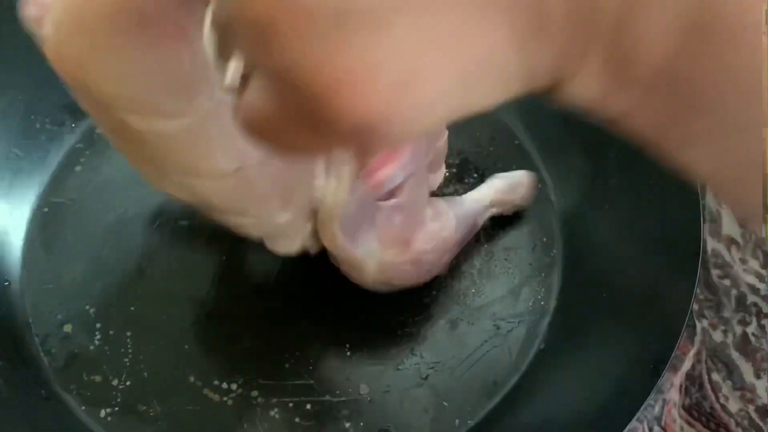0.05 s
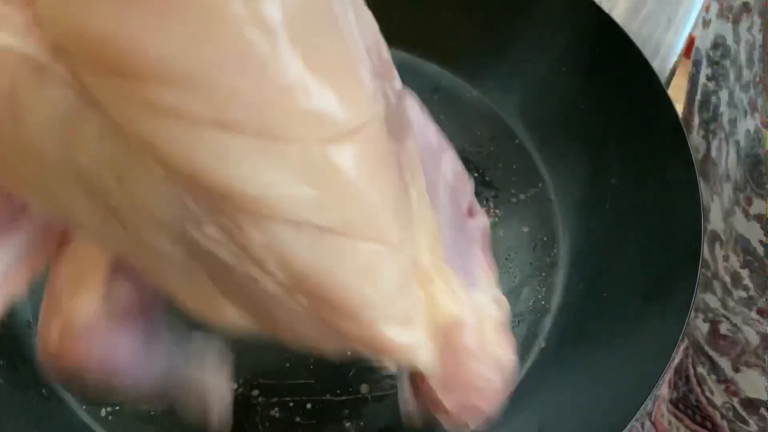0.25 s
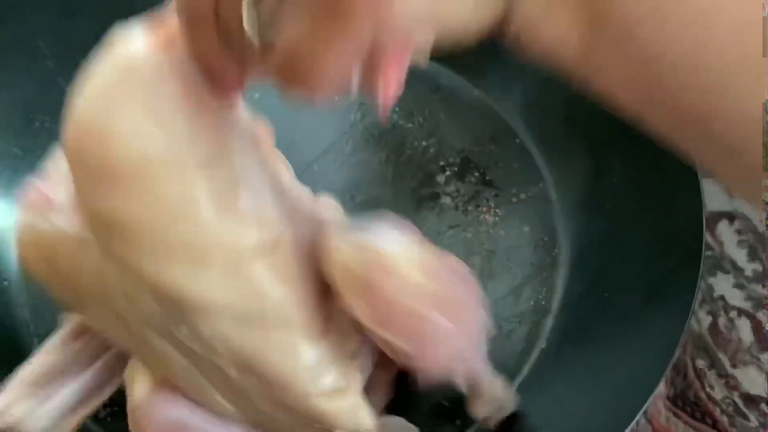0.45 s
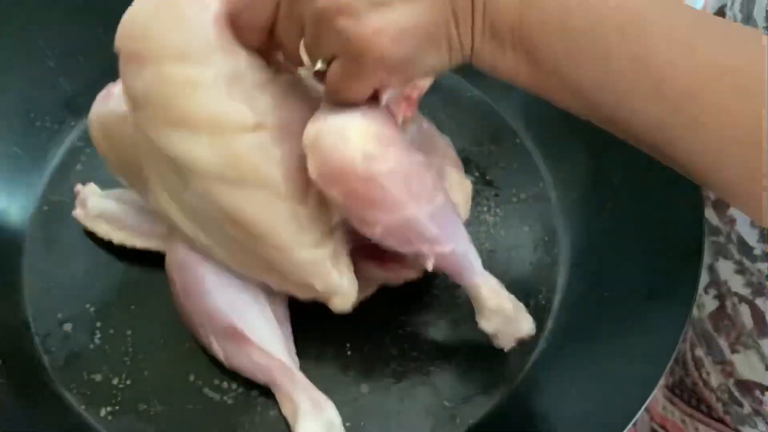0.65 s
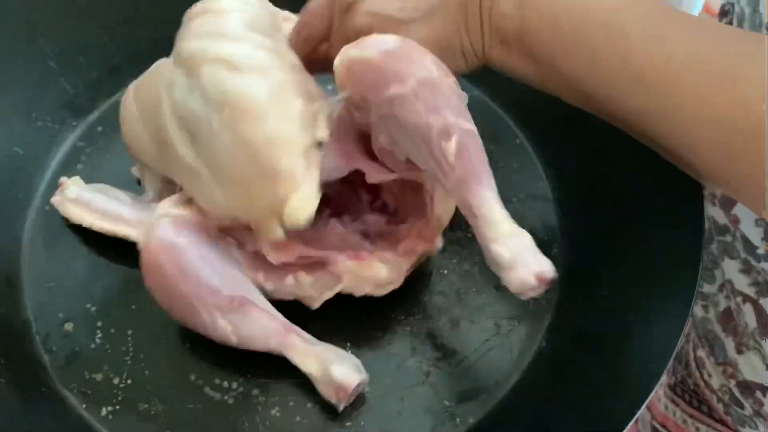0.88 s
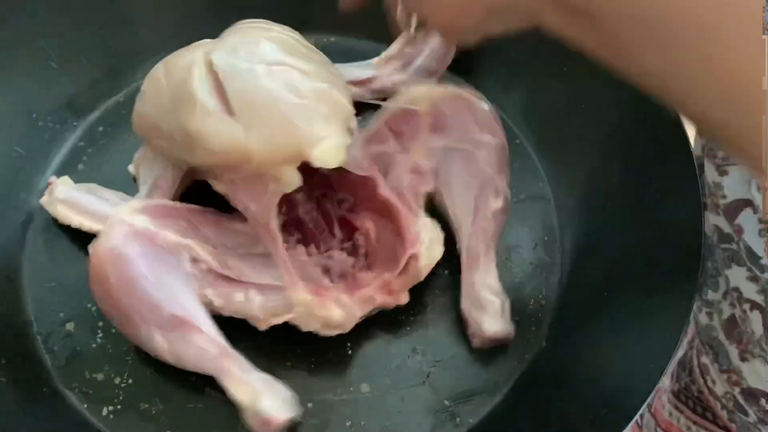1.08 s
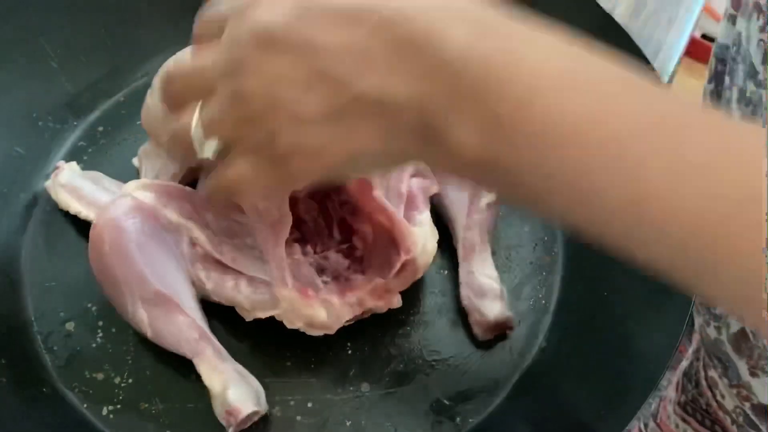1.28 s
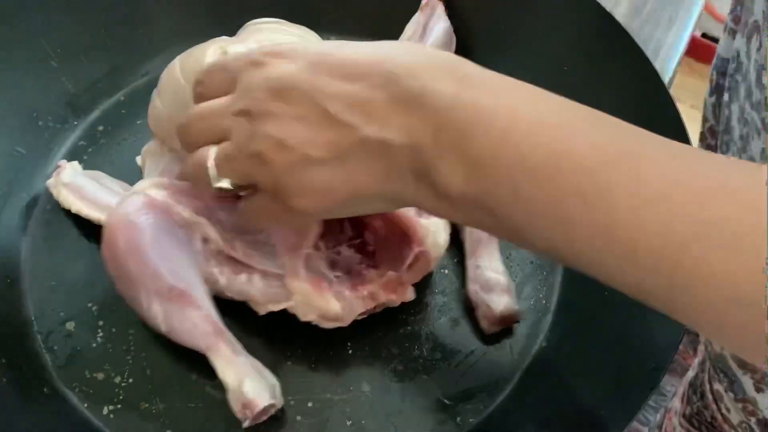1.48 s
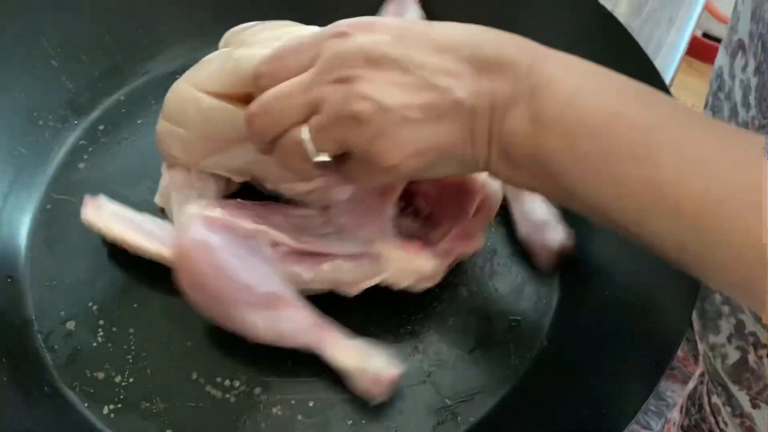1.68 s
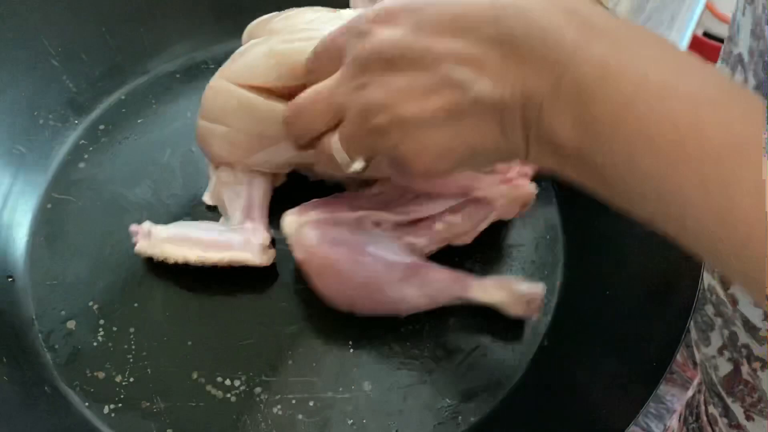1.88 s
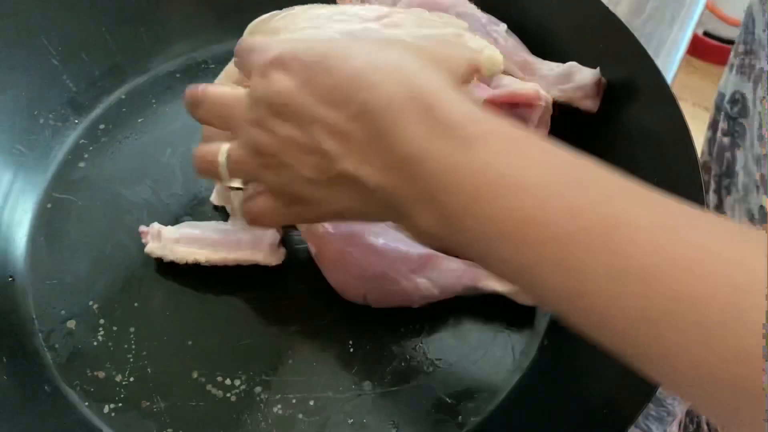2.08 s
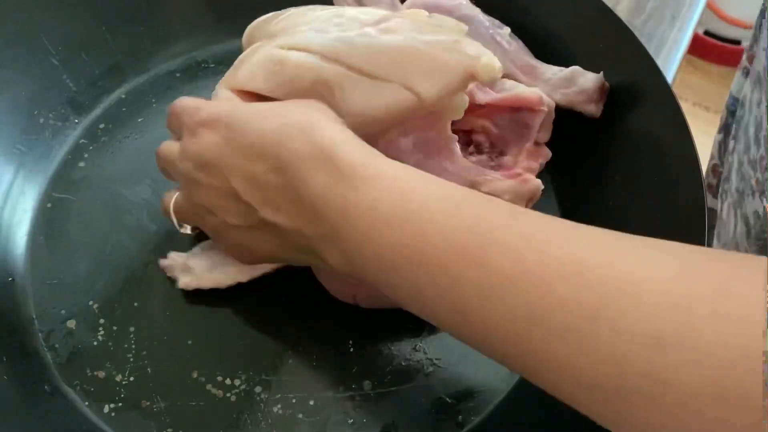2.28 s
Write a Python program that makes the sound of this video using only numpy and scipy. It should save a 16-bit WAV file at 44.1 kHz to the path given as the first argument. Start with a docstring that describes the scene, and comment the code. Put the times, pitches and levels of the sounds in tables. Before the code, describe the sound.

Wet slaps, soft thuds and sticky squishes of raw chicken being turned in a pan.

```python
"""In a quiet kitchen, close by, a raw chicken is turned over by hand in a wide metal pan.
At 0.2 s it slaps down and rolls; near 0.4 s it lands with a soft thud, each impact exciting the
pan's low modes into a boom. Then the fingers shift their grip: wet skin squishes, films of juice snap,
bubbles ring, and friction makes the metal sing thinly. Lighter bumps follow near 1 s and 1.6 s,
the last over a faint, deep drone, and a wet smack closes the scene at 2.4 s."""
import sys
import numpy as np
from scipy import signal
from scipy.fft import rfft, irfft
from scipy.io import wavfile
from scipy.ndimage import uniform_filter1d

SR = 44100
rng = np.random.default_rng(int(sys.argv[2]) if len(sys.argv) > 2 else 0)


def log_audio(samples):
    """Write samples as a 16-bit WAV file to the path given in sys.argv[1]."""
    # one column per channel
    frames = np.atleast_2d(samples).T
    # limit to full scale, then quantise
    limited = np.clip(frames, -1, 1)
    pcm = np.round(limited * 32767).astype(np.int16)
    wavfile.write(sys.argv[1], SR, pcm)


N = 108045
T = np.arange(N) / SR

# impacts of the bird on the pan: start_s, boom_db, thud_db, thud_centre_hz, thud_t60_s, damping_t60_s
IMPACTS = [(.199, -29, -31, 565, 0.24, 0.37), (0.245, -31.5, -80, 424, 0.084, 0.51),
           (0.28, -26, -39.5, 443, 0.22, 0.3), (0.296, -24, -39, 145, 0.2, 0.14),
           (0.362, -31, -26, 440, 0.065, 0.44), (.378, -49, -19.5, 270, 0.066, 0.35),
           (.391, -26, -33.5, 214, 0.08, 0.43), (.54, -42.5, -61, 243, 0.046, 0.7),
           (0.873, -53.5, -47, 467, 0.16, 0.78), (0.973, -48, -58, 348, 0.061, 0.61),
           (1.003, -48.5, -72, 159, 0.071, 0.94), (1.615, -46.5, -49.5, 450, 0.48, 1)]


def amp(db):
    """Converts decibels to an amplitude ratio."""
    return 10 ** (np.asarray(db) / 20)


def unit(x):
    """Normalises a signal to an rms of 1."""
    return x / np.sqrt(np.mean(x ** 2) + 1e-20)


def read(points, hz):
    """Interpolates a table of (frequency_hz, value) on a logarithmic frequency axis."""
    frequency_hz, value = np.transpose(points)
    return np.interp(np.log(hz + 1), np.log(frequency_hz + 1), value)


def add(mix, start_s, sound):
    """Superposition: sums a sound into the mix from start_s on."""
    part = mix[..., max(round(start_s * SR), 0):][..., :sound.shape[-1]]
    part += sound[..., :part.shape[-1]]


def colour(x, points):
    """Zero-phase filtering by a table of (frequency_hz, gain_db)."""
    hz = np.fft.rfftfreq(x.shape[-1], 1 / SR)
    return irfft(rfft(x) * amp(read(points, hz)), x.shape[-1])


def pair_noise(size):
    """Spatial coherence: white noise at two microphones is alike in the bass, unrelated in the treble."""
    # likeness of left and right: frequency_hz, coherence
    likeness = [(60, 1), (130, 0.91), (290, 0.78), (640, 0.22), (1400, 0.048), (15000, .05)]
    coherence = np.clip(read(likeness, np.fft.rfftfreq(size, 1 / SR)), 0, 1)
    left, independent = rfft(rng.standard_normal((2, size)))
    right = coherence * left + np.sqrt(1 - coherence ** 2) * independent
    return irfft(np.array([left, right]), size)


def arrive(x, left_lag_s=0.000185):
    """Path difference: sound from the bird reaches the left microphone just after the right."""
    delay = np.exp(-2j * np.pi * np.fft.rfftfreq(N, 1 / SR) * left_lag_s)
    return np.array([irfft(rfft(x) * delay, N), x])


def burst(centre_hz, width_octaves, rise_s, t60_s, skirt_db, size=16384):
    """A damped resonance as a band of noise, with a linear rise and an exponential decay."""
    t = T[:size]
    octaves = np.log2((np.fft.rfftfreq(size, 1 / SR) + 1) / centre_hz)
    band = np.exp(-0.5 * (octaves / width_octaves) ** 2) + amp(skirt_db) / (1 + octaves ** 4)
    envelope = np.minimum(t / rise_s, 1) * amp(-60 * np.maximum(t - rise_s, 0) / t60_s)
    rush = irfft(rfft(pair_noise(size)) * band) * envelope
    return rush * np.linalg.norm(envelope) / np.linalg.norm(rush, axis=1, keepdims=True)


def stick_slip(spread_db, span_samples):
    """Amplitude modulation: a gain that flutters at random as skin sticks and slips."""
    flutter = unit(uniform_filter1d(rng.standard_normal(N), size=span_samples))
    return unit(amp(spread_db * flutter))


def background(drone_hz=37.7, drone_start_s=1.35, drone_end_s=2.04, fade_s=0.083):
    """Ambient noise: a steady room murmur, and a deep pure tone that comes and goes."""
    # spectrum of the room's murmur: frequency_hz, density_db
    murmur_spectrum = [(20, -69), (40, 8.5), (55, -1.5), (75, 9.5), (100, 2), (125, 2), (180, -9.5),
                       (330, -11.5), (660, -4.5), (850, -20), (1500, -21.5), (2300, -57), (3500, -60.5),
                       (4200, -45.5), (5000, -38.5), (10000, -55), (16000, -90)]
    murmur = amp(-54) * unit(colour(pair_noise(N), murmur_spectrum))
    swell = np.clip(np.minimum(T - drone_start_s, drone_end_s - T) / fade_s, 0, 1)
    drone = amp(-56.5) * swell * unit(np.sin(2 * np.pi * drone_hz * T))
    return murmur + drone


def kitchen(x, wall_db, pan_db, size=22050):
    """Reverberation: early reflections from the pan's sides and a short diffuse tail from the walls."""
    # reverberation time of the room: frequency_hz, t60_s
    decay_times = [(100, 0.57), (500, 0.23), (2100, 0.26), (4200, 0.41), (9000, 0.13), (16000, 0.024)]
    t = T[:size]
    hz, frame_s, spectra = signal.stft(pair_noise(size), SR, nperseg=256)
    decay = amp(-60 * frame_s / read(decay_times, hz)[:, None])
    tail = signal.istft(spectra * decay, SR, nperseg=256)[1][:, :size]
    tail *= np.minimum(t / 0.0049, 1)
    early = pair_noise(size) * np.exp(-t / 0.0027) * (t > 0.001)
    response = (amp(wall_db) * unit(tail) + amp(pan_db) * unit(early)) / np.sqrt(size)
    return x + signal.fftconvolve(x, response, axes=1)[:, :N]


def slides(centre_hz=4050, width_octaves=0.13):
    """Stick-slip friction: dragging skin keeps the pan's high modes singing as a narrow noise band."""
    # slides of the bird over the metal: start_s, length_s, level_db
    drags = [(0.679, 0.15, -59), (1.769, 0.15, -69.5), (2.013, .15, -67.5)]
    octaves = np.log2((np.fft.rfftfreq(N, 1 / SR) + 1) / centre_hz)
    singing = unit(irfft(rfft(pair_noise(N)) / (1 + (octaves / width_octaves) ** 4), N))
    pressure = sum(amp(level_db) * np.sin(np.pi * np.clip((T - start_s) / length_s, 0, 1))
                   for start_s, length_s, level_db in drags)
    return singing * pressure * stick_slip(spread_db=2.5, span_samples=300)


def pan_zing(drive, t60_s=0.075):
    """Forced vibration: wet contacts and rubbing drive a cluster of high modes in the pan."""
    # high modes of the metal: pitch_hz, level_db
    high_modes = [(3650, -18), (3850, 0.5), (4064, -4), (4251, 2.5), (4371, 0), (4720, -2), (4904, -3.5),
                  (5179, -4)]
    t = T[:SR // 2]
    ring = sum(amp(level_db - 60 * t / t60_s) * np.sin(2 * np.pi * (pitch_hz * t + rng.random((2, 1))))
               for pitch_hz, level_db in high_modes)
    return signal.fftconvolve(drive, ring / np.linalg.norm(ring[0]), axes=1)[:, :N]


def squish(grains_per_s=2200, pitch_count=28, decay_cycles=1.33):
    """Shot noise: countless tiny bubbles crackle over the dull friction noise of skin on metal."""
    # course of the rubbing: time_s, crackle_db, rub_db
    rubbing = [(0, -60.5, -58), (0.063, -53, -51.5), (0.121, -104, -67), (0.192, -61, -57.5),
               (.22, -52, -53.5), (.42, -50, -46), (0.519, -65.5, -60.5), (.64, -67.5, -62),
               (.72, -62, -59), (.89, -56, -58), (1.03, -65.5, -60.5), (1.14, -86, -65.5),
               (1.32, -64, -63.5), (1.39, -63, -59), (1.579, -59.5, -60), (1.68, -54.5, -63.5),
               (1.8, -66.5, -64.5), (1.88, -85, -68), (2.01, -86, -69.5), (2.1, -64, -63.5),
               (2.17, -51.5, -64), (2.28, -66, -62.5), (2.38, -58.5, -62.5), (2.45, -46.5, -53)]
    # colour of the tiny bubbles: frequency_hz, gain_db
    crackle_colour = [(900, -44), (1800, -15), (3200, -2.5), (4200, 3), (5500, -7), (8000, 2.5),
                      (11000, -7.5), (16000, 2)]
    # spectrum of the friction: frequency_hz, density_db
    rub_spectrum = [(60, -10), (150, 1), (350, 6.5), (650, -1.5), (900, 1), (1400, -6), (2200, -10),
                    (5000, -27.5)]
    time_s, crackle_db, rub_db = np.transpose(rubbing)
    t, grains = T[:256], np.zeros(N)
    strengths = amp(-np.minimum(rng.exponential(1, N), 4.5))
    impulses = strengths * (rng.random(N) < grains_per_s / SR)
    pitch_index = rng.integers(0, pitch_count, N)
    for k, pitch_hz in enumerate(np.linspace(1200, 15500, pitch_count)):
        grain = np.exp(-t * pitch_hz / decay_cycles) * np.sin(2 * np.pi * (pitch_hz * t + rng.random()))
        grains += signal.oaconvolve(impulses * (pitch_index == k), unit(grain))[:N]
    crackle = unit(arrive(colour(grains, crackle_colour))) * stick_slip(spread_db=3, span_samples=400)
    rub = unit(colour(pair_noise(N), rub_spectrum))
    return crackle * amp(np.interp(T, time_s, crackle_db)) + rub * amp(np.interp(T, time_s, rub_db))


def bubbles(rise_s=0.0004, climb_per_t60=0.04):
    """Bubble resonance: each one bursts with a damped ping that climbs slightly in pitch."""
    # small bursting bubbles: start_s, level_db, pitch_hz, t60_s
    pings = [(0.38, -22.5, 7430, 0.0095), (.382, -30, 4050, .014), (0.548, -36, 7150, 0.0072),
             (0.565, -42, 2480, 0.016), (.7095, -38.5, 2405, 0.023), (0.71, -42, 7300, .01),
             (.811, -43, 3150, .022), (1.26, -36, 1120, 0.0073), (1.3539, -41.5, 6400, 0.011),
             (1.4555, -35.5, 7900, 0.0054), (1.501, -36.5, 4265, 0.02), (2.135, -29.5, 7700, 0.017),
             (2.19, -39, 6470, 0.011), (2.4377, -27.5, 6250, 0.019)]
    t, out = T[:4096], np.zeros(N)
    for start_s, level_db, pitch_hz, t60_s in pings:
        envelope = np.minimum(t / rise_s, 1) * amp(level_db - 60 * t / t60_s)
        cycles = pitch_hz * t * (1 + 0.5 * climb_per_t60 * t / t60_s)
        add(out, start_s, envelope * np.sin(2 * np.pi * cycles))
    return arrive(out)


def pops():
    """Cavity resonance: pockets of trapped air ring briefly, rising in pitch as they open."""
    # air pockets: start_s, level_db, pitch_hz, glide_hz_per_s, rise_s, t60_s
    pockets = [(.3775, -20.5, 290, 20000, .003, .032), (.9655, -37, 2120, 7000, .003, .023)]
    t, out = T[:4096], np.zeros((2, N))
    for start_s, level_db, pitch_hz, glide_hz_per_s, rise_s, t60_s in pockets:
        envelope = np.minimum(t / rise_s, 1) ** 2 * amp(level_db - 60 * np.maximum(t - rise_s, 0) / t60_s)
        cycles = pitch_hz * t + 0.5 * glide_hz_per_s * t ** 2
        add(out, start_s, envelope * np.sin(2 * np.pi * cycles))
    return out


def snaps():
    """Film rupture: each sticky film of juice tears with a dry, bright click."""
    # tearing films: start_s, level_db, centre_hz, width_octaves
    films = [(0.3863, -23, 8700, .3), (0.4166, -34.5, 10900, 1.2), (.446, -42, 12000, .4),
             (0.556, -45, 12900, 0.53), (0.6067, -48.5, 12100, .6), (0.6472, -42.5, 13400, 1.44),
             (.6812, -38, 9800, 0.27), (0.691, -37.5, 9000, 0.42), (0.7464, -35, 13200, 0.19),
             (.7557, -31.5, 3860, 0.86), (.844, -47, 9000, 1.1), (.8612, -42, 10900, 2.8),
             (0.901, -44, 5970, 1), (.9096, -42, 11000, 1.3), (.9227, -45, 13600, 0.62),
             (0.9373, -33.5, 8550, 0.32), (1.0211, -41.5, 13000, 1.8), (1.025, -40, 13000, 0.94),
             (1.178, -52.5, 10100, .4), (1.263, -50.5, 6000, .6), (1.4111, -40.5, 10200, 0.43),
             (1.501, -37.5, 6000, 0.44), (1.6073, -37, 5760, 0.85), (1.812, -45, 7300, 0.38),
             (2.0513, -48, 14200, 0.57), (2.1174, -43, 7950, 0.66), (2.1365, -31.5, 7500, 0.24),
             (2.155, -37, 7200, 0.33), (2.254, -45, 6500, 0.28), (2.33, -41.5, 9000, 0.53)]
    out = np.zeros(N)
    for start_s, level_db, centre_hz, width_octaves in films:
        click = burst(centre_hz, width_octaves, rise_s=0.00015, t60_s=0.0055, skirt_db=-22, size=2048)[0]
        add(out, start_s, amp(level_db) * click)
    return arrive(out)


def smacks():
    """Adhesion: wet skin meets the metal or peels away in a dense, uneven spatter."""
    # wet contacts: start_s, level_db, centre_hz, width_octaves, rise_s, t60_s
    contacts = [(0.194, -33.5, 4600, 0.31, 0.0057, 0.17), (0.1961, -34, 4200, 0.89, 0.0004, 0.061),
                (.1965, -34.5, 727, 0.17, 0.0007, 0.049), (.285, -51, 4300, .2, 0.0058, .19),
                (.286, -44.5, 11000, 2.5, 0.003, 0.19), (0.3439, -32.5, 4740, 6.6, 0.0029, 0.036),
                (0.358, -38, 3200, 1.7, 0.011, 0.11), (0.368, -32, 8400, 3.6, .00058, 0.052),
                (.7558, -43, 2980, 0.42, 0.00028, 0.12), (0.764, -39, 3100, 2.1, 0.0005, 0.066),
                (0.966, -49, 2730, 0.38, .002, 0.031), (1.386, -48, 1580, 0.4, 0.00083, 0.013),
                (1.499, -47.5, 2400, 0.49, 0.0012, 0.035), (1.608, -53.5, 4520, 0.24, 0.0027, 0.27),
                (1.606, -47.5, 1730, 0.21, 0.00088, 0.019), (1.7, -52, 6840, 0.46, .002, 0.087),
                (2.2, -58, 2600, 0.27, 0.0036, 0.26), (2.401, -47, 4040, 0.48, 0.00091, 0.057),
                (2.431, -36.5, 5760, .94, 0.0036, 0.076), (2.427, -50.5, 1200, 1.3, 0.011, 0.14)]
    out = np.zeros((2, N))
    for start_s, level_db, centre_hz, width_octaves, rise_s, t60_s in contacts:
        add(out, start_s, amp(level_db) * burst(centre_hz, width_octaves, rise_s, t60_s, skirt_db=-44))
    return out * stick_slip(spread_db=3.5, span_samples=90)


def thuds():
    """Inelastic impact: soft flesh flattens against the metal with a low burst of noise."""
    # colour of the flesh's impact: frequency_hz, gain_db
    flesh_colour = [(40, -5), (100, -2.5), (620, -3), (780, -8.5), (1000, -7), (1600, -6.5), (4000, -20)]
    out = np.zeros((2, N))
    for start_s, _, thud_db, centre_hz, t60_s, _ in IMPACTS:
        thud = burst(centre_hz, width_octaves=1, rise_s=0.003, t60_s=t60_s, skirt_db=-13.5)
        add(out, start_s, amp(thud_db) * thud)
    return colour(out, flesh_colour)


def pan_boom(rise_s=0.018):
    """Damped free vibration: each impact rings the pan's modes, and the flesh lying on it damps them."""
    # low modes of the loaded pan: pitch_hz, level_db, t60_s
    low_modes = [(81.8, 1.5, 0.6), (93.8, 6, 0.22), (139.7, -1.5, 0.46), (185.8, -8, 0.54),
                 (280, -14.5, 0.92), (327, -12.5, 0.33), (437.5, -17.5, 0.29), (572, -18, 0.55),
                 (665, -18.5, 0.7), (936, -22.5, 0.28)]
    t, out = T[:SR], np.zeros(N)
    ring = sum(amp(level_db - 60 * t / t60_s) * np.sin(2 * np.pi * pitch_hz * t)
               for pitch_hz, level_db, t60_s in low_modes)
    for start_s, boom_db, _, _, _, damping_t60_s in IMPACTS:
        envelope = np.minimum(t / rise_s, 1) * amp(boom_db - 60 * t / damping_t60_s)
        add(out, start_s, envelope * ring)
    return np.array([out, out])


def scene():
    """Level panning: impacts, pops and metal lie a little to the left, the wet sounds near the middle."""
    heavy = pan_boom() + kitchen(thuds(), wall_db=-6, pan_db=-26)
    contacts = snaps() + smacks()
    rubbing = squish()
    wet = kitchen(contacts + bubbles() + rubbing, wall_db=-10, pan_db=-8)
    metal = pan_zing(amp(-8) * contacts + amp(-17) * rubbing) + slides()
    popping = kitchen(pops(), wall_db=-9, pan_db=-11)
    return heavy * amp([[1.7], [-1.7]]) + (popping + metal) * amp([[1.2], [-1.2]]) + wet + background()


def record(dry, cutoff_hz=15950):
    """Frequency response: the microphone colours the sound, then a low-pass filter limits the band."""
    # microphone response: frequency_hz, gain_db
    response = [(20, -16), (40, -2), (11500, -2), (13000, -4.5), (16000, -5)]
    low_pass = signal.firwin(401, cutoff_hz, window=("kaiser", 8), fs=SR)
    return signal.oaconvolve(colour(dry, response), low_pass[None], "same")


dry = scene()
out = record(dry)
log_audio(out)
```